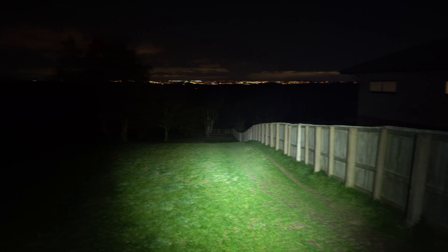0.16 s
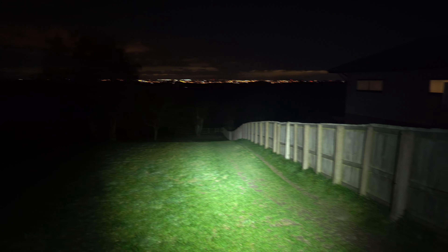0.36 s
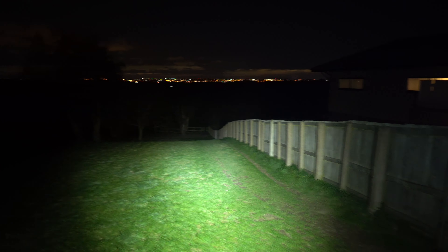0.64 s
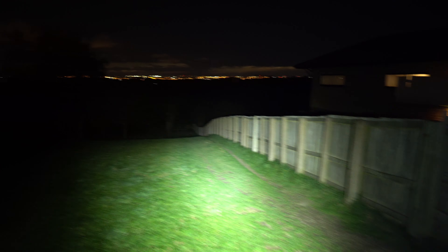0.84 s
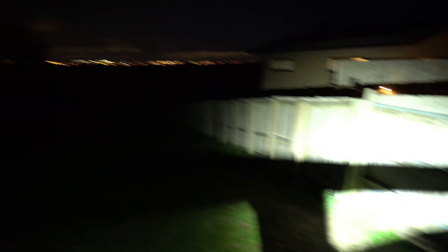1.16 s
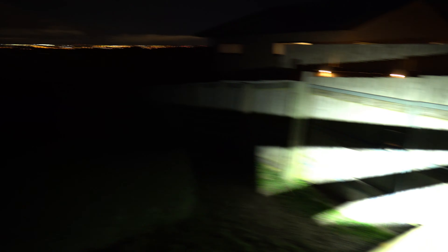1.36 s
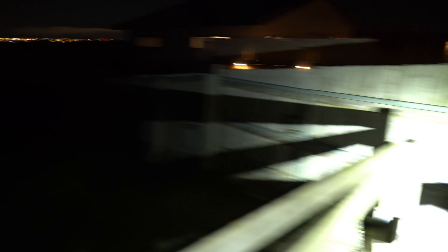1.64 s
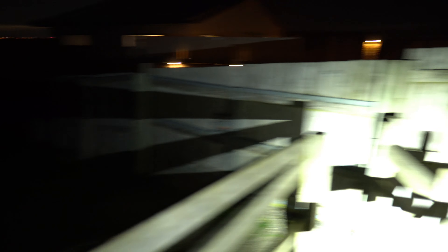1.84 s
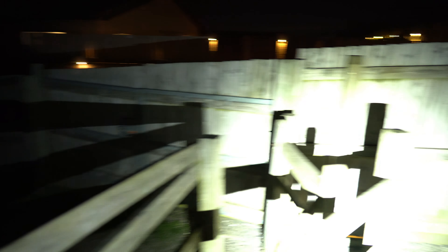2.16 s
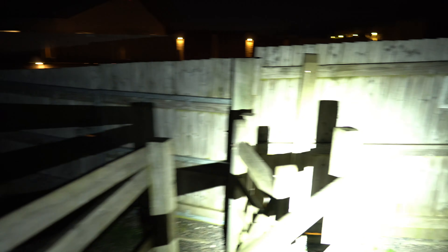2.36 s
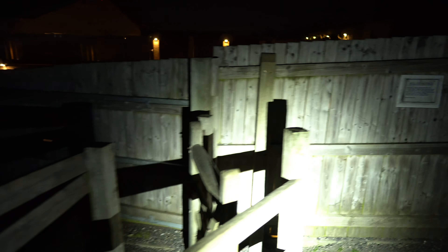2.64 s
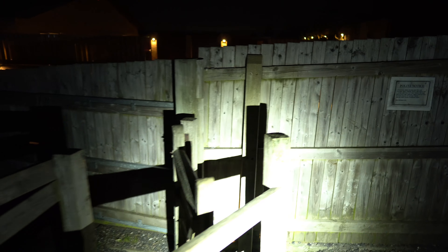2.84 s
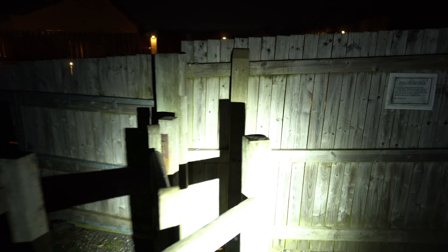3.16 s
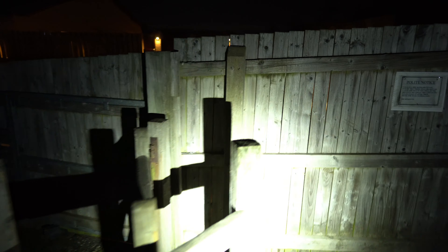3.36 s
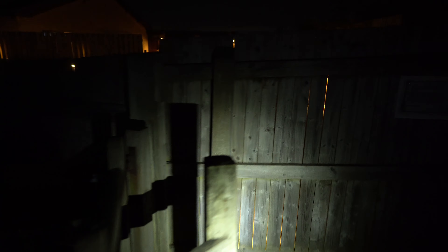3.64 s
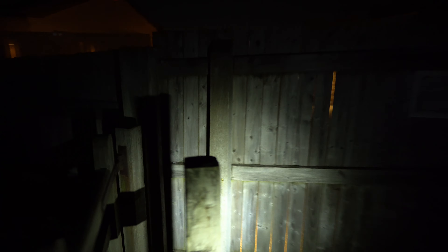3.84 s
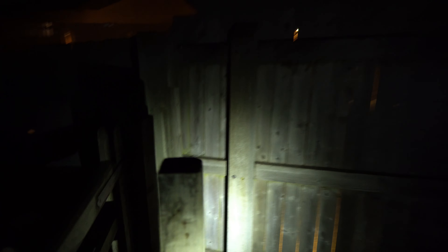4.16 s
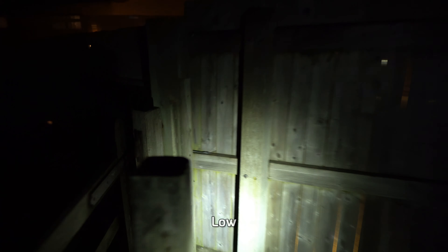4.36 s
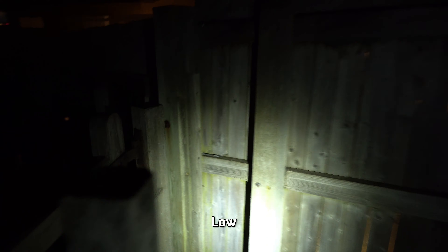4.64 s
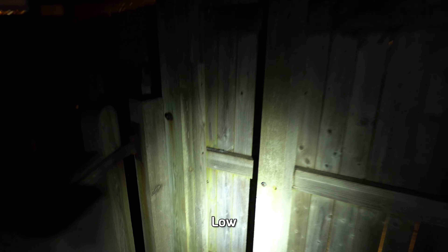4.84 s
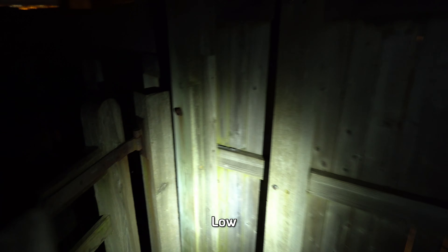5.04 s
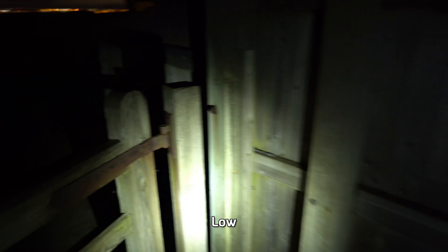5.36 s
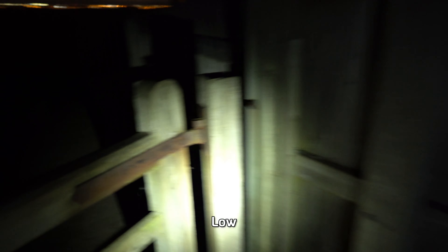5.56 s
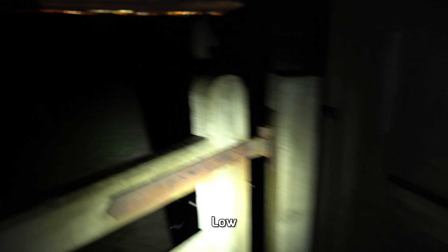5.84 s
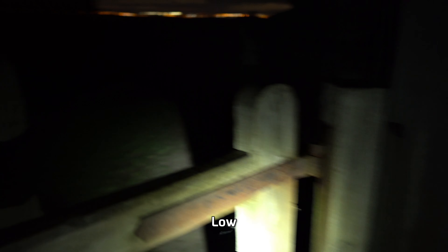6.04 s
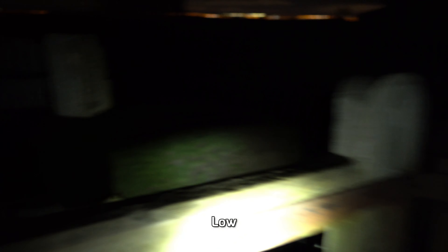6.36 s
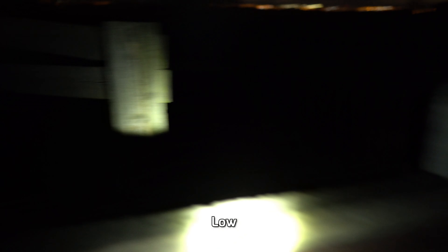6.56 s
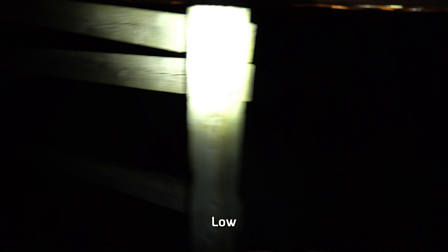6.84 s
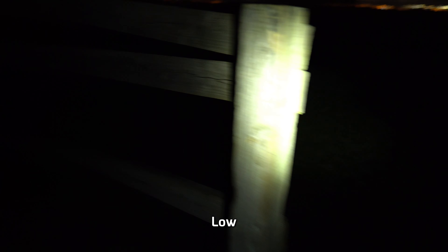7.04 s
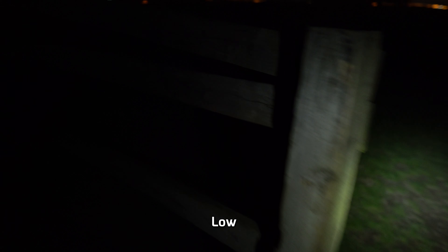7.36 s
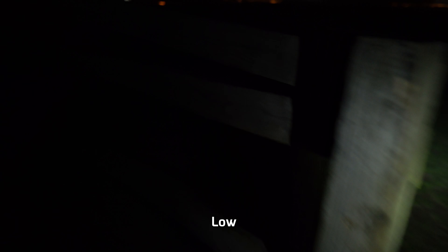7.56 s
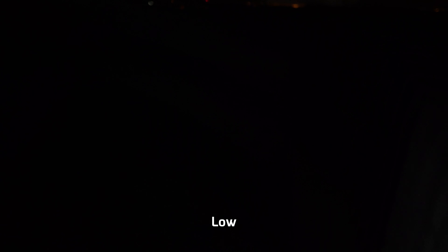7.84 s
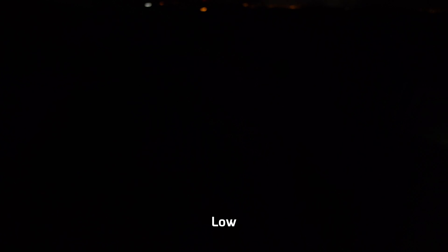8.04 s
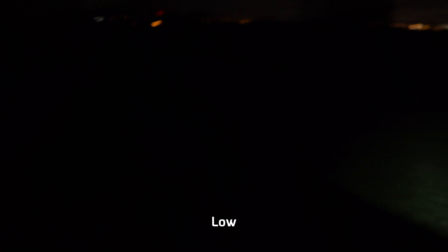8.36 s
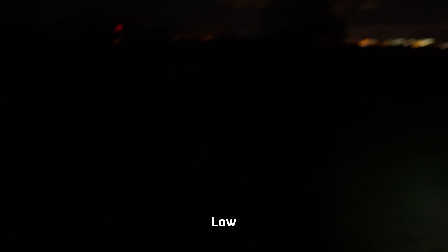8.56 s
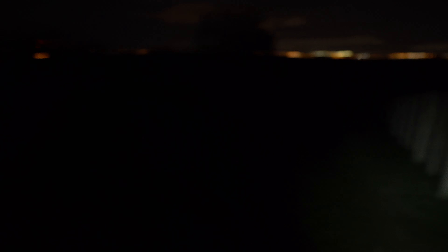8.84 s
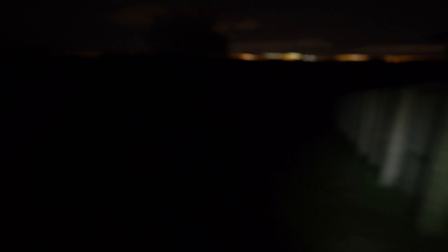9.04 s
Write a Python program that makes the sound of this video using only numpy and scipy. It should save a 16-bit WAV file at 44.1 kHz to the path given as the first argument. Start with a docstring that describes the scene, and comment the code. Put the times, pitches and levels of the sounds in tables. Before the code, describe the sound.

Close to the walker's body, slow uneven footsteps crush grass, soil and small stones in the open night air. Pebbles knock sharply, loudest around three seconds, dry stalks snap, and grass and clothing swish between steps. Later a sleeve rubs a wooden post. A low rumble and faint far machine drone continue underneath, with a few barely noticeable distant hoots.

```python
"""A low outdoor rumble and a far machine drone, then slow footsteps, heard close to the body,
over grass and a stony patch by a wooden gate at night.
Steps crush the ground as showers of filtered grains, with thuds of short noise and stones as brief ringing contacts.
Dry stalks snap as sharp cracks; grass and clothing swish as dense moving hiss, and a sleeve of ticks rubs a post.
Hoarse noise resonances hoot faintly far off, above a drone of wavering sines, soft hiss and a thin steady whine."""
import sys
import numpy as np
from scipy import signal
from scipy.fft import rfft, irfft, next_fast_len
from scipy.io import wavfile
from scipy.ndimage import uniform_filter1d

SR = 44100
rng = np.random.default_rng(int(sys.argv[2]) if len(sys.argv) > 2 else 0)


def generate_wav(sig):
    """Save sig (samples, or channels by samples) to the path in sys.argv[1] as 16-bit PCM at SR."""
    pcm = np.round(np.clip(np.atleast_2d(sig).T, -1, 1) * 32767).astype(np.int16)
    wavfile.write(sys.argv[1], SR, pcm)


N = 405719
T = np.arange(N) / SR
SIDES = np.array([[1], [-1]])  # opposite signs for left and right


def undb(db):
    """Decibels to gain."""
    return 10 ** (np.asarray(db) / 20)


def unit(x):
    """Scale to rms 1."""
    return x / np.sqrt(np.mean(x ** 2))


def colour(x, spectrum):
    """Filter by (frequency [Hz], level [dB]) points joined on a log-frequency axis."""
    hz, db = np.transpose(spectrum)
    size = next_fast_len(x.shape[-1] + 2048)
    f = np.maximum(np.fft.rfftfreq(size, 1 / SR), 1)
    gain = undb(np.interp(np.log(f), np.log(hz), db))
    return irfft(rfft(x, size) * gain, size)[..., :x.shape[-1]]


def band(x, hz, ratio):
    """Band-pass from hz / ratio to hz * ratio, kept inside the audible range."""
    ratio = max(ratio, 1.05)
    edges = np.minimum([hz / ratio, hz * ratio], [.4 * SR, .48 * SR])
    return signal.sosfilt(signal.butter(2, edges, "band", fs=SR, output="sos"), x)


def walk(rate):
    """Smooth random wandering of rms 1, with rate new targets a second."""
    k = int(SR / rate)
    targets = np.repeat(rng.standard_normal(N // k + 1), k)
    return unit(uniform_filter1d(uniform_filter1d(targets, k), k)[:N])


def grains(rate, spread_db):
    """Random impulses, about rate a second, a few much larger than the rest."""
    sizes = undb(spread_db * np.minimum(rng.exponential(size=N), 3.3))
    return unit((rng.random(N) < rate / SR) * sizes * rng.choice([-1, 1], N))


def add(out, s, sound):
    """Mix a sound in at time s."""
    i = max(int(s * SR), 0)
    out[..., i:i + sound.shape[-1]] += sound[..., :max(N - i, 0)]


def contact(t, hz, sharp):
    """One brief contact: a ringing pulse that peaks after one cycle, then dies away."""
    u = t * hz
    return (u * np.exp(1 - u)) ** sharp * np.cos(2 * np.pi * u)


def press(s, rise_s, hold_s, release_s):
    """Pressure of one contact: it builds, holds at 1 and dies away."""
    return np.exp(-np.maximum(s - T, 0) / rise_s - np.maximum(T - s - hold_s, 0) / release_s)


# a foot presses down, stays and eases off; levels are before the layer gains:
# (time at full pressure [s], rise [s], hold [s], release [s], crunch level [dB], swish level [dB])
STEP_PRESSES = [(0.59, 0.01, 0.022, 0.15, -75, -81), (0.927, 0.052, 0.071, .025, -62, -81),
                (1.715, 0.055, 0.012, 0.08, -59, -53.5), (2.663, 0.082, 0.047, 0.021, -38.5, -55),
                (3.277, 0.089, 0.055, 0.65, -53, -55), (3.92, 0.052, 0.15, 0.072, -49, -56),
                (4.4, 0.01, 0.19, 0.045, -50, -59.5), (5.155, 0.069, 0.046, 0.16, -52.5, -58),
                (5.664, 0.026, 0.19, 0.017, -52, -70), (6.296, 0.012, 0.18, 0.033, -51, -60),
                (6.776, 0.019, 0.11, 0.043, -49.5, -53), (7.162, 0.037, 0.073, 0.064, -67, -55.5),
                (7.578, 0.044, 0.15, 0.1, -50, -48), (8.49, 0.042, 0.2, 0.065, -62, -60),
                (8.87, 0.0076, 0.056, 0.011, -52, -54)]


def treading():
    """How hard the steps crush the ground and brush the grass; overlapping steps add in power."""
    pressure = np.array([press(*row[:4]) for row in STEP_PRESSES])
    levels = undb(np.array(STEP_PRESSES)[:, 4:].T)
    return np.sqrt(levels ** 2 @ pressure ** 2)


# small stones by size: (pitch [Hz], relative level [dB])
PEBBLE_SIZES = [(700, -7), (1050, -5), (1450, -7)]


def pebbles(rate, spread_db, ratio):
    """Small stones of a few sizes tick at their own pitches, each size at rate a second."""
    return unit(sum(undb(db) * band(grains(rate, spread_db), hz, ratio) for hz, db in PEBBLE_SIZES))


# a sole grinds or slides: (time [s], level [dB], length [s], ring of the ground [Hz],
# grit level relative to the scuff [dB])
SOLE_SCUFFS = [(0.968, -53, 0.081, 1140, -26), (1.748, -52, 0.098, 1070, -14),
               (1.87, -49.5, 0.082, 1030, -16), (2.537, -51, 0.04, 1000, -7),
               (2.66, -41, 0.069, 1000, -1.5), (3.224, -44, 0.045, 895, -10),
               (3.283, -40, 0.027, 1430, -12), (3.861, -40, 0.013, 1220, -8),
               (3.902, -45.5, 0.044, 830, -4.5), (3.962, -46, 0.039, 1350, 3.5),
               (4.373, -55.5, 0.069, 855, 0.5), (5.154, -49, 0.055, 825, -7.5),
               (5.654, -43, 0.036, 930, -7), (5.727, -47.5, 0.012, 1130, -1), (6.247, -48, 0.073, 930, -4),
               (6.326, -47.5, 0.0084, 1540, 1), (6.378, -47, 0.074, 1130, 0),
               (6.806, -39.5, 0.011, 1400, -26), (6.836, -39, 0.041, 970, -12),
               (7.187, -57, 0.06, 2150, -6), (7.555, -35.5, 0.0079, 620, -8),
               (8.895, -42.5, 0.025, 660, -0.5)]


def scuffs(strikes, soil, grit, ring_db=-4, ring_ratio=1.154, attack_s=0.002, release_s=.012):
    """A scuff presses harder, rings the patch under the sole and scatters grit to both sides."""
    out = np.zeros((2, N))
    for s, db, length, hz, scatter_db in SOLE_SCUFFS:
        part = slice(int(s * SR), int(s * SR) + SR // 4)
        t = T[part] - T[part][0]
        release = np.exp(-np.maximum(t - length, 0) / release_s)
        push = undb(db) * (1 - np.exp(-t / attack_s)) * release
        ring = undb(ring_db) * unit(band(strikes[part], hz, ring_ratio))
        add(out, s, push * (soil[part] + ring + undb(scatter_db) * grit[:, part]))
    return out


# crushed soil: (frequency [Hz], relative density level [dB per Hz])
SOIL_SPECTRUM = [(100, 3.5), (200, 8), (400, 7), (800, 5), (1100, 7), (1500, 4), (2100, -1.5), (2800, -10),
                 (5000, -34)]
# fine grit: (frequency [Hz], relative density level [dB per Hz])
GRIT_SPECTRUM = [(1200, 0), (2200, 10.5), (3100, 5.5), (4200, 5.5), (7500, 4), (9500, -1.5), (12000, -13),
                 (16000, -48)]


def crunch(crush, tread_db=-1.5, soil_db=-4, grit_db=-17):
    """A rolling foot shifts pebbles one by one over soil and grit; a scuff crushes many grains at once."""
    clumps = unit(undb(3.0 * walk(200)))
    strikes = grains(850, spread_db=3.3) * clumps
    soil = unit(colour(strikes, SOIL_SPECTRUM))
    scatter = np.array([grains(2200, spread_db=4.6) for _ in range(2)])
    grit = unit(colour(scatter * clumps, GRIT_SPECTRUM))
    bed = pebbles(70, spread_db=2.4, ratio=1.35)
    tread = undb(tread_db) * crush * (bed + undb(soil_db) * soil + undb(grit_db) * grit)
    return tread + scuffs(strikes, soil, grit)


# stones knocking under the sole: (time [s], level [dB], pitch [Hz], crack level [dB])
STONE_KNOCKS = [(0.574, -38, 560, -64), (0.6092, -41, 1534, -57), (0.7823, -31.5, 980, -51),
                (0.7999, -31, 940, -50), (0.8613, -36, 1070, -60), (0.8933, -39, 1240, -62),
                (0.9248, -33, 1160, -56), (.949, -41, 1290, -58), (0.9628, -26.5, 950, -52),
                (1.008, -40, 1250, -54), (1.0261, -36, 890, -50), (1.049, -32, 1040, -56),
                (1.7158, -29, 1090, -43), (1.7445, -22.5, 990, -48), (1.778, -30, 1240, -50),
                (1.7952, -19, 1150, -37), (1.8443, -29, 920, -38), (1.9447, -32, 920, -56),
                (2.0086, -23.5, 1100, -36.5), (2.1262, -35.5, 1070, -56), (2.177, -36.5, 805, -58),
                (2.3543, -38, 740, -58), (2.5747, -24.5, 1030, -42), (2.597, -20.5, 1430, -33),
                (2.6112, -14.5, 1320, -28), (2.6788, -13, 1030, -22), (2.6958, -19, 1120, -29),
                (2.7031, -18.5, 890, -32), (2.709, -25, 1020, -35), (3.2739, -9.5, 1240, -27.5),
                (3.3665, -23.5, 1250, -44), (3.3853, -31, 1530, -37), (3.4787, -27.5, 1320, -36),
                (3.5592, -28, 1250, -51), (3.5984, -37.5, 1320, -56), (3.66, -27.5, 1330, -50),
                (3.9368, -26, 684, -48), (3.9783, -28, 1590, -34), (4.0504, -28, 1270, -42),
                (4.1689, -32.5, 1160, -56), (4.3978, -31, 1160, -51), (4.47, -30, 1020, -47),
                (4.565, -18, 1140, -29.5), (4.571, -33, 1150, -34), (4.8445, -25, 1130, -37.5),
                (5.2024, -30.5, 750, -39), (5.3327, -27, 1060, -41), (5.6269, -20, 1060, -35),
                (5.6947, -29, 1050, -50), (5.7313, -30, 1550, -46), (5.7949, -25.5, 1280, -36),
                (5.8164, -33.5, 1040, -38), (6.333, -28, 1400, -35), (6.414, -30, 1030, -49),
                (6.4392, -39, 1360, -26.5), (6.917, -31, 1200, -48), (7.1806, -28, 1700, -26.5),
                (7.534, -31.5, 400, -60), (7.5914, -26, 1530, -22), (7.6745, -29, 1230, -45),
                (7.716, -24, 1110, -38), (8.4819, -27, 940, -34), (8.5257, -25, 1350, -30),
                (8.5998, -29, 1320, -38), (8.6536, -34, 854, -50), (8.8982, -26.5, 810, -32),
                (8.9198, -28, 750, -36), (9.0711, -22.5, 830, -39)]


def knocks(aside=0.31, slip_db=-23, bounce_db=-14, rattle_db=-12.0, settle_db=-31,
           crack_hz=3500, crack_s=0.0016):
    """A stone slips, cracks against its neighbour and bounces once; the bed rattles and settles."""
    out, t = np.zeros((2, N)), np.arange(SR // 10) / SR
    fade = undb(rattle_db) * np.exp(-t / 0.004) + undb(settle_db) * np.exp(-t / 0.03)
    for s, db, hz, crack_db in STONE_KNOCKS:
        rattle = unit(band(rng.standard_normal(len(t)), hz, 1.3))
        rattle = rattle * fade * np.minimum(t * hz / 2, 1)
        crack = band(rng.standard_normal((2, len(t))) * np.exp(-t / crack_s), crack_hz, 1.84)
        # place to either side, time to the bounce [s], pitch ratio of slip and bounce
        lean, flight, detune = rng.uniform([-.5, .002, .8], [.5, .007, 1.4])
        size = undb(db) * (1 + aside * lean * SIDES)
        light = contact(t, hz * detune, sharp=3)
        add(out, s - 1 / hz, size * (contact(t, hz, sharp=5.6) + rattle))
        add(out, s, undb(crack_db) * crack / np.abs(crack).max())
        add(out, s - flight / 2 - 1 / hz, size * undb(slip_db) * light)
        add(out, s + flight, size * undb(bounce_db) * light)
    return out


# weight landing on the turf: (time [s], level before the thud gain [dB])
TURF_THUDS = [(0.581, -39), (1.023, -40), (1.719, -37), (2.672, -33), (3.924, -31.5), (4.466, -35.5),
              (5.163, -40.5), (6.273, -38.5), (6.846, -45), (7.555, -29), (8.898, -29.5), (8.919, -38)]


def thuds(thud_db=-3, body_hz=190):
    """The turf takes the weight with a short, dull bump of low noise."""
    out, t = np.zeros(N), np.arange(SR // 8) / SR
    fall = np.exp(-t / .014)
    for s, db in TURF_THUDS:
        bump = band(rng.standard_normal(len(t)) * fall, body_hz, 1.77)
        add(out, s, undb(db + thud_db) * 2 * bump / np.abs(bump).max())
    return out


def strays(crush, stray_db=-27, follow=0.57):
    """Loose stones tick here and there, louder while a foot presses on them."""
    return pebbles(9, spread_db=1.5, ratio=1.4) * crush ** follow * undb(stray_db)


# dry stalks and grit snapping: (time [s], level [dB], pitch [Hz], tearing time [s])
STALK_SNAPS = [(1.018, -35, 8100, 0.0025), (1.611, -40.5, 3250, 0.0025), (1.681, -29, 6800, 0.0085),
               (2.295, -35, 7000, 0.0019), (2.42, -37.5, 4750, 0.0012), (2.476, -32.5, 3670, 0.0042),
               (2.774, -28.5, 6850, 0.0066), (3.244, -28.5, 4870, 0.0056), (3.4625, -34, 3140, 0.0028),
               (3.529, -32, 4930, 0.0031), (4.155, -22.5, 8900, 0.0015), (4.175, -26, 6000, 0.0025),
               (4.188, -27, 8650, .003), (4.258, -31, 10500, 0.0079), (4.332, -15.5, 7300, 0.002),
               (5.023, -38, 3930, 0.0013), (6.662, -32, 7900, .002), (6.78, -27, 6900, 0.0022),
               (7.1801, -35, 3960, 0.0032), (7.5834, -21, 4130, 0.0057), (8.8695, -26, 6200, 0.0074)]


def snaps(fibre_db=-15, edge_db=-13, stem_db=-18, ring_db=-12):
    """A stalk breaks with a crack, rings briefly and its fibres tear; the ports hear it a moment apart."""
    out, t = np.zeros((2, N)), np.arange(SR // 20) / SR
    for s, db, hz, tear_s in STALK_SNAPS:
        late = np.maximum(t - rng.uniform(0, .00005, (2, 1)), 0)
        crack = contact(late, hz, sharp=4.5)
        crack += undb(stem_db) * contact(late, hz / 2, sharp=4.5)
        crack += undb(edge_db) * contact(np.maximum(late - 1 / hz, 0), 12000, sharp=3)
        fibres = unit(band(rng.standard_normal((2, len(t))), hz, 1.8))
        tearing = undb(fibre_db) * np.exp(-t / tear_s) * fibres
        ring = undb(ring_db) * np.sin(2 * np.pi * hz * late) * np.exp(-t * hz / 10)
        add(out, s + .0005, undb(db) * (crack + tearing + ring))
    return out


# a leg swings through the grass between footfalls: (time at full speed [s], half length [s],
# level before the swish gain [dB], hiss centre [Hz], height of the hiss peak [dB])
LEG_SWINGS = [(0.62, 0.22, -64, 7500, 3.4), (1.22, 0.2, -55, 6700, 5.1), (1.977, 0.26, -61, 6700, 2.7),
              (2.686, 0.22, -56.5, 7000, 2.7), (3.47, 0.094, -66, 7500, 3.6), (4.1, 0.17, -58, 8400, 4.2),
              (4.547, 0.32, -61.5, 8240, 3.3), (5.29, 0.1, -57.5, 8040, 1.3), (5.693, 0.19, -56, 7900, 1.3),
              (6.53, 0.28, -55.5, 8200, 1.5), (6.77, 0.055, -53, 6160, 12), (7.3, 1, -59, 7600, 3.5),
              (7.655, 0.14, -53.5, 7800, 6.8), (8.364, 0.13, -52.5, 5700, 6.2),
              (9.165, 0.26, -59, 6900, 2.1)]


def swinging(sag_octaves=0.031):
    """Each swing speeds up and slows in a bell as its hiss sinks: gives strength, peak pitch and height."""
    s, half_s, db, hz, peak_db = np.array(LEG_SWINGS).T[..., None]
    along = np.clip((T - s) / half_s, -7, 7)
    power = undb(db) ** 2 * np.exp(-along ** 2)
    total = power.sum(axis=0)
    # the hiss sinks by sag_octaves in each half length
    centre = hz * 2 ** (-sag_octaves * np.clip(along, -2, 2))
    hiss_hz = (centre * power).sum(axis=0) / total
    height_db = (peak_db * power).sum(axis=0) / total
    return np.sqrt(total), hiss_hz, height_db


# grass and cloth: (frequency [Hz], relative density level [dB per Hz])
BRUSH_SPECTRUM = [(600, 5.5), (1500, 8.5), (2900, 7), (4200, 6), (7500, 4), (9500, 1.5), (12000, -3.5),
                  (16000, -10)]


def swish(strength, hiss_hz, peak_db, swish_db=2, shared=0.4, peak_octaves=0.32):
    """Countless blades and fibres flick past the legs; a broad peak in their hiss follows the rub."""
    left, right, both = (grains(12000, spread_db=5.5) for _ in range(3))
    # now and then a stiffer stem catches and flicks free
    stems = .36 * np.array([grains(55, spread_db=3) for _ in range(2)])
    flicks = np.array([left, right]) + shared * both + stems
    f, s, frames = signal.stft(colour(flicks, BRUSH_SPECTRUM), SR, nperseg=256)
    octaves = np.log2((f[:, None] + 1) / np.interp(s, T, hiss_hz))
    peak = np.interp(s, T, peak_db) * (np.exp(-.5 * (octaves / peak_octaves) ** 2) - .5)
    # the colour shifts as other tufts come into play
    blur = np.outer(np.hanning(9), np.hanning(60))
    patches = 1.7 * unit(signal.fftconvolve(rng.standard_normal(peak.shape), blur, "same"))
    rub = signal.istft(frames * undb(peak + patches))[1][:, :N]
    flutter = undb(1.1 * walk(50) + 1.2 * walk(260))
    return unit(rub) * flutter * strength * undb(swish_db)


# soil under a dragging foot: (frequency [Hz], relative density level [dB per Hz])
DRAG_SPECTRUM = [(120, 5), (300, 2.5), (650, -0.5), (1200, 3), (2000, -3), (2800, -17), (5000, -39)]


def dragging(swing, drag_db=1):
    """A swinging foot drags over the soil in a dense shower of grains, following the swing's strength."""
    return swing * undb(drag_db) * unit(colour(grains(6000, spread_db=3), DRAG_SPECTRUM))


# clothing slides along the gate post: (time at full pressure [s], rise [s], hold [s], release [s])
POST_SLIDE = (7.57, .015, 0.35, 0.37)
# resonances of that rub: (frequency [Hz], width ratio, level [dB])
POST_RINGS = [(441, 1.06, -63), (1420, 1.24, -57), (3890, 1.06, -64), (6000, 1.08, -69)]


def slide(catch_db=2):
    """Clothing catches and slips along the post; the fine ticks sing in a few narrow resonances."""
    ticks = grains(3000, spread_db=2) * undb(catch_db * walk(25))
    rings = sum(undb(db) * unit(band(ticks, hz, ratio)) for hz, ratio, db in POST_RINGS)
    return press(*POST_SLIDE) * rings


# faint hollow hoots from far off: (time at the loudest [s], half length [s], level [dB], pitch [Hz])
FAR_HOOTS = [(3.065, 0.098, -50.5, 610), (8.33, 0.079, -47.5, 657), (9.153, 0.035, -50, 660)]


def hoots(core_ratio=1.04, halo_db=-5, halo_ratio=1.28, upper_db=-9, upper_ratio=2.14):
    """Each hoot is a hoarse narrow resonance in a wider halo with a weak overtone, blurred by distance."""
    out = np.zeros(N)
    for s, half_s, db, hz in FAR_HOOTS:
        air = rng.standard_normal((3, N))
        tone = unit(band(air[0], hz, core_ratio))
        tone += undb(halo_db) * unit(band(air[1], hz, halo_ratio))
        tone += undb(upper_db) * unit(band(air[2], hz * upper_ratio, halo_ratio))
        swell = np.exp(-np.minimum(((T - s) / half_s) ** 2 / 2, 60))
        out += undb(db) * unit(tone) * swell
    return out


# outdoor rumble: (frequency [Hz], relative density level [dB per Hz])
RUMBLE_SPECTRUM = [(12, -1.5), (25, -1), (60, 1.5), (80, -4), (105, -7.5), (150, -14), (300, -22.5),
                   (600, -28), (1300, -39), (2500, -42.5), (6000, -87)]
# rumble as the walker moves: (time [s], level before the rumble gain [dB])
RUMBLE_LEVELS = [(0, -45.5), (2.2, -46), (4.4, -47), (5.7, -44), (7.1, -45), (8.2, -46.5), (8.7, -45.5),
                 (9.2, -43)]


def rumble(rumble_db=3, apart=0.18):
    """Low rumble of air: mostly shared noise with a little difference between the sides."""
    air = rng.standard_normal(N) + apart * rng.standard_normal(N) * SIDES
    level_db = np.interp(T, *np.transpose(RUMBLE_LEVELS)) + rumble_db
    return unit(colour(air, RUMBLE_SPECTRUM)) * undb(level_db) * undb(1.3 * walk(6))


# far machinery: (frequency [Hz], relative level [dB], wavering share of strength, also phase [rad])
DRONE_TONES = [(38, 1.5, 0.44), (91.2, -16, 0.99)]


def drone(drone_db=-43):
    """Far machinery hums on low tones whose strength and phase waver."""
    out = np.zeros(N)
    for hz, db, waver in DRONE_TONES:
        tone = np.sin(2 * np.pi * hz * T + waver * walk(4.4))
        out += undb(db) * unit((1 + waver * walk(7)) * tone)
    return out * undb(drone_db)


def hiss(hiss_db=-71):
    """A faint, steady hiss, independent on each side."""
    return undb(hiss_db) * unit(band(rng.standard_normal((2, N)), 5700, 1.66))


def whine():
    """A thin, barely audible electronic whine: one steady sine."""
    return undb(-86) * np.sin(2 * np.pi * 13101 * T)


def scene(still_db=-72):
    """The walker's steps and swish in the open night air; clothing never quite rests."""
    crush, brush = treading()
    swing, hiss_hz, peak_db = swinging()
    rub = np.sqrt(brush ** 2 + swing ** 2 + undb(still_db) ** 2)
    ground = crunch(crush) + knocks() + thuds() + strays(crush) + snaps()
    clothing = swish(rub, hiss_hz, peak_db) + dragging(swing) + slide()
    background = hoots() + rumble() + drone() + hiss() + whine()
    return ground + clothing + background


# the two microphone ports: (frequency [Hz], left minus right [dB])
PORT_LEAN = [(200, 0.5), (700, 1.1), (1300, -0.8), (2400, -1.5), (4200, 4.5), (6000, 5), (8000, 3),
             (13000, -4.5)]


def record(dry, top_hz=15900):
    """Each microphone port has its own colour; the top is cut."""
    hz, lean_db = np.transpose(PORT_LEAN)
    ports = np.array([colour(x, np.transpose([hz, side * lean_db / 2])) for x, side in zip(dry, (1, -1))])
    return signal.sosfilt(signal.ellip(8, .2, 70, top_hz, fs=SR, output="sos"), ports)


dry = scene()
out = record(dry)
generate_wav(out)
```